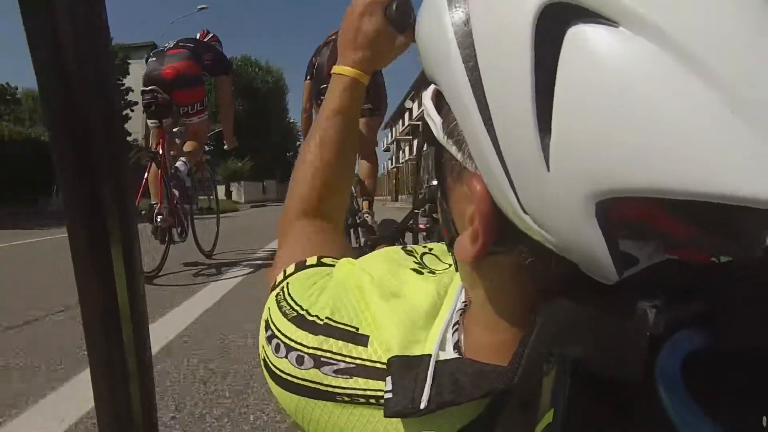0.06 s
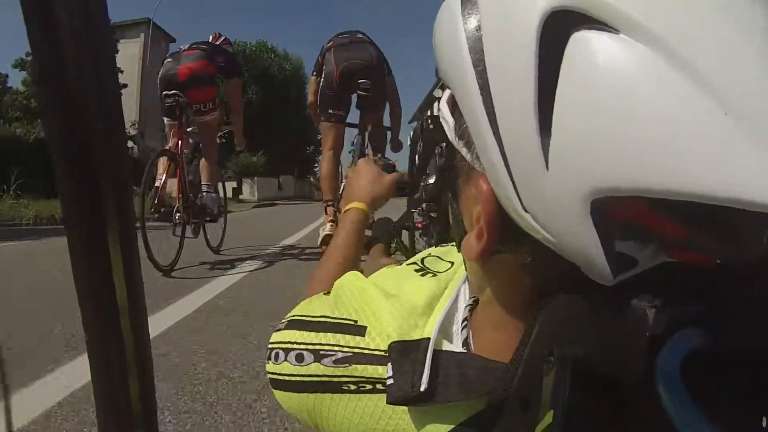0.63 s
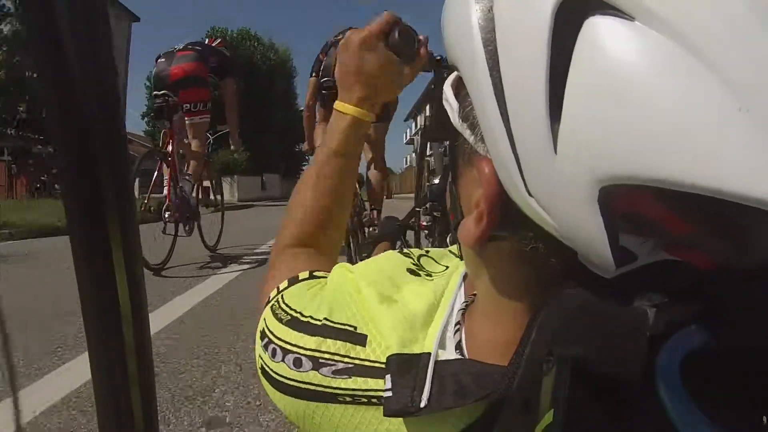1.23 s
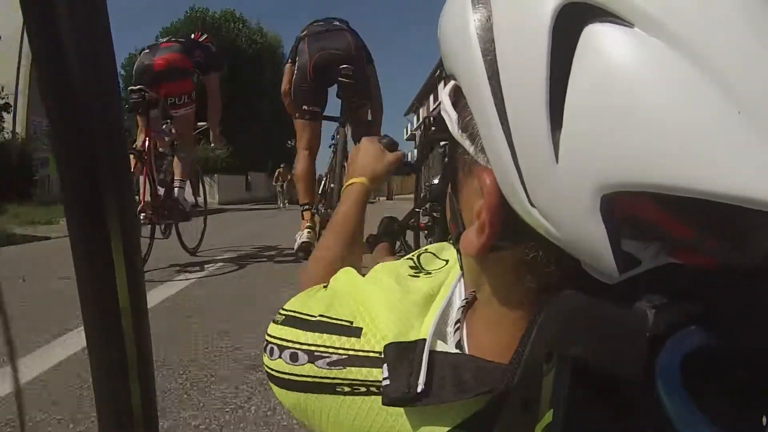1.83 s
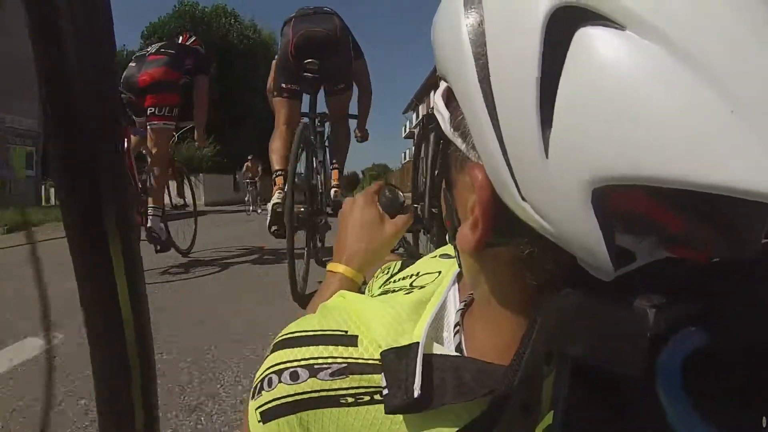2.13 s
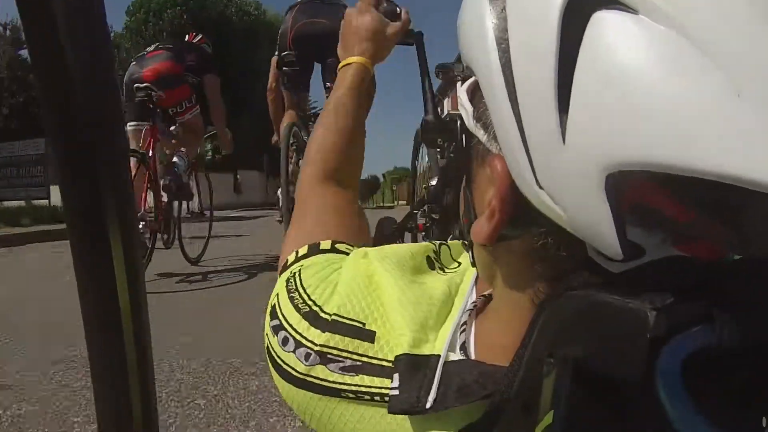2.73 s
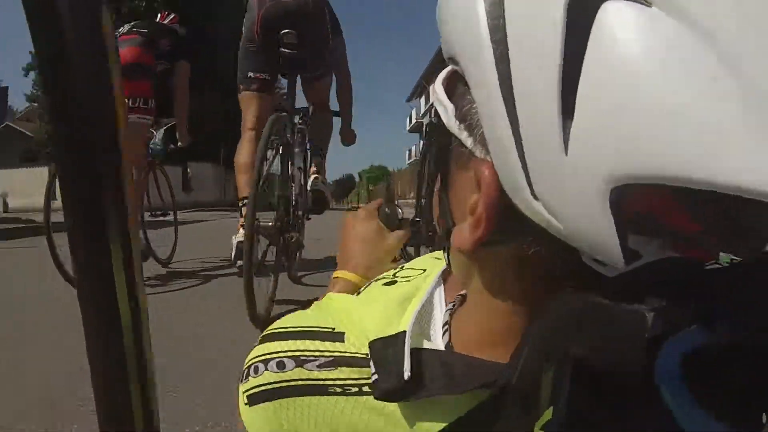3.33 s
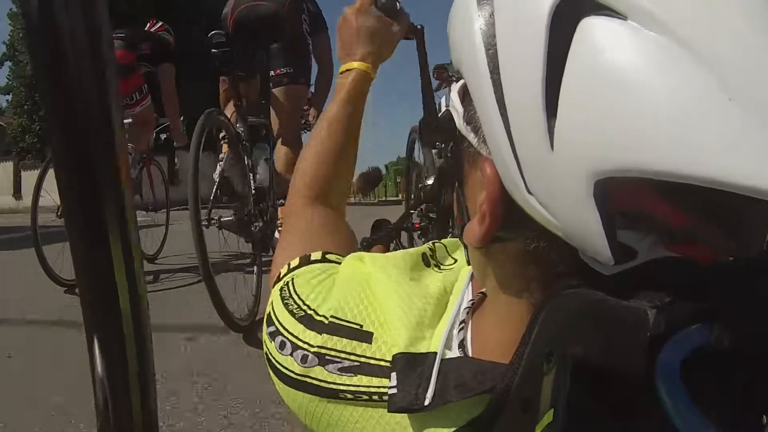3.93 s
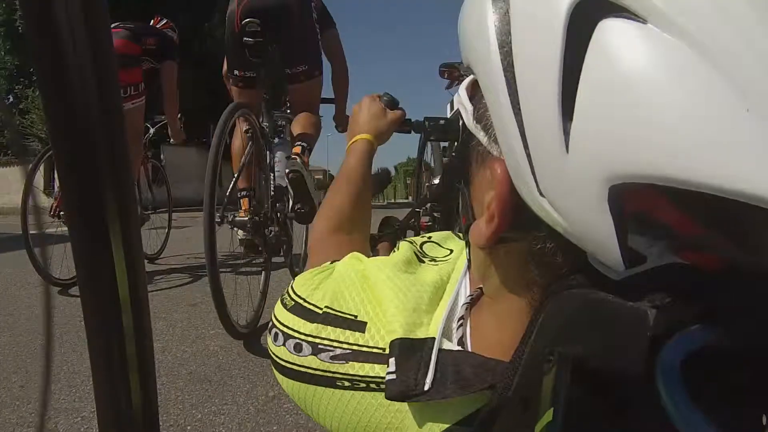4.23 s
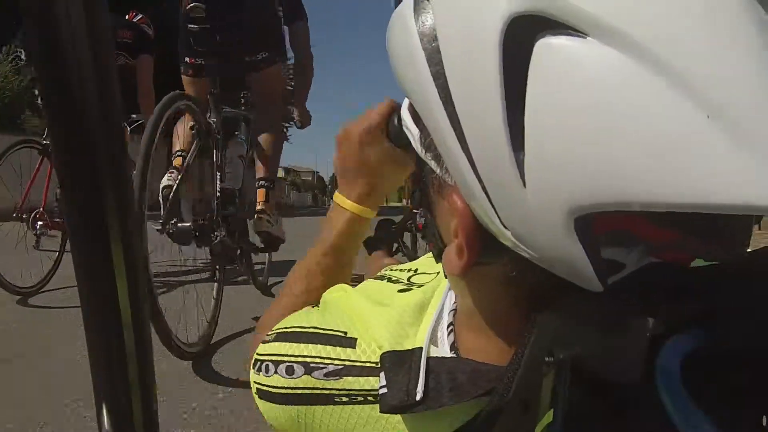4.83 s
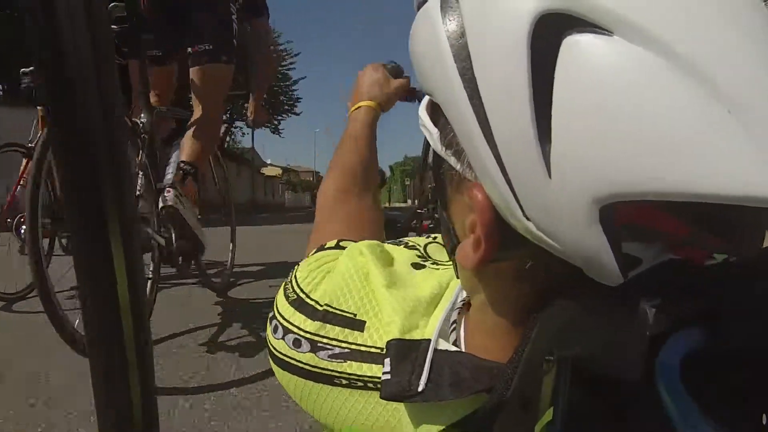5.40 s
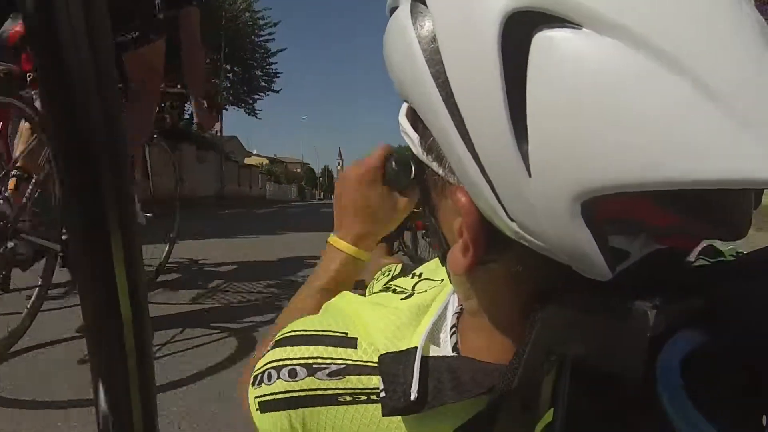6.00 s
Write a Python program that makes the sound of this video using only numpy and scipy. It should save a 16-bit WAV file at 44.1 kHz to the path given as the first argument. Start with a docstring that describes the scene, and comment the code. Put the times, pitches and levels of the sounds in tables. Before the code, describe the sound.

Wind rumbles in quick gusts on a microphone enclosed in a hard case on a moving handbike. Road vibration makes a wavering low hum, with tyres and chain rushing softly behind it. Plastic rattles busily through the first half, broken by thumps from bumps and a drain cover. The ride then sounds smoother for a moment, until lighter rattling and more clattering bumps arrive near the end.

```python
"""A camera in a hard case rides on a fast handbike over asphalt. From the start the road shakes its
mount into a rough low hum, wind rumbles on the microphone, the frame drones, tyres and chain rush,
and the case chatters on the swings. Bumps and a drain cover thump and clatter, hardest near 1 s,
2.2 s and 3.3 s. The chatter then drops away and partly returns before more bumps at 5.2-5.8 s."""
import sys
import numpy as np
from scipy import signal
from scipy.fft import rfft, irfft
from scipy.io import wavfile
from scipy.ndimage import uniform_filter1d

SR = 44100
rng = np.random.default_rng(int(sys.argv[2]) if len(sys.argv) > 2 else 0)


def to_wav(s):
    """Save 16-bit WAV."""
    ch = np.atleast_2d(s).T  # columns
    pcm = np.round(np.clip(ch, -1, 1) * 32767)  # PCM
    wavfile.write(sys.argv[1], SR, pcm.astype(np.int16))


N = 271656
TIME = np.arange(N) / SR

# jolts that bottom out the mount: t/s, relative thump/dB, relative snap/dB, lull depth/dB
JOLT_EVENTS = [(0.111, -7, -16, 0), (.963, -8, -10, 1.5), (0.981, -2, -10, -2), (2.143, -1.5, -10, 1),
               (2.169, -12, -17, 0.5), (2.304, -9.5, -4.5, 2), (2.653, -4, -14, 1), (2.875, -4.5, -22, 1.5),
               (2.971, -5, -10.5, -0.5), (3.19, -4, -8, 6.5), (3.21, -5.5, -3.5, -0.5),
               (3.307, 0.5, -4, 6.5), (3.972, -18, -18, 0), (4.38, -11, -22, 0.5), (5.237, -4.5, -14, 0.5),
               (5.494, -15, -4, 1), (5.778, -5.5, -7, 7)]
# case resonances: f/Hz, width/Hz, lift/dB
CASE_MODES = [(573, 82, 4.5), (758, 8.3, 6.5), (885, 34, 7), (1097, 53, -6.5), (1450, 75, 2.5),
              (2052, 200, 4), (2270, 92, 1.5), (3840, 100, 4.5), (4260, 80, 3), (5150, 19, -12.5)]
# spectrum of the tapped case walls: f/Hz, level/dB
PING_SPECTRUM = [(800, -14), (1350, -2), (1550, -2.5), (1750, -16.5), (1930, 2.5), (2100, 3.5), (2230, -8),
                 (2380, 2), (2560, -6.5), (2720, -19.5), (3300, -28), (4400, -31)]
# spectrum of loose parts: f/Hz, level/dB
CLATTER_SPECTRUM = [(100, 1.5), (250, 10.5), (420, 7.5), (520, 1.5), (630, 3.5), (950, -4), (1500, -1.5),
                    (2200, -5.5), (2650, -3), (3000, -6.5), (3450, -18), (4500, -28), (6200, -35.5),
                    (12000, -54.5)]


def from_db(db):
    """Decibels to gain."""
    return 10 ** (np.asarray(db) / 20)


def curve(rows):
    """Breakpoints joined by lines over time."""
    return np.interp(TIME, *np.transpose(rows))


def levelled(x, window_s):
    """Holds the running rms at 1; faster flutter stays."""
    size = max(int(window_s * SR), 8)
    power = uniform_filter1d(uniform_filter1d(x ** 2, size), size)
    return x / np.sqrt(abs(power) + 1e-4 * np.mean(x ** 2))


def wander(rate_hz):
    """Smooth random signal, rms 1, bandwidth about rate_hz."""
    lowpass = np.exp(-(np.fft.rfftfreq(N, 1 / SR) / rate_hz) ** 2)
    drift = irfft(rfft(rng.standard_normal(N)) * lowpass, N)
    return drift / drift.std()


def coloured(x, spectrum, modes=(), size=16384):
    """Minimum-phase filter of unit energy: broad spectrum, steep ends, resonances on top."""
    hz = abs(np.fft.fftfreq(size, 1 / SR)) + 1
    points_hz, points_db = np.transpose(spectrum)
    points_hz = np.sort(points_hz)
    octaves_outside = abs(np.log2(hz / np.clip(hz, points_hz[0], points_hz[-1])))
    db = np.interp(np.log(hz), np.log(points_hz), points_db)
    db = np.maximum(db - 48 * octaves_outside, -120)
    for centre_hz, width_hz, lift_db in modes:
        db = db + lift_db / (1 + (2 * (hz - centre_hz) / width_hz) ** 2)
    response = np.exp(np.conj(signal.hilbert(np.log(from_db(db)))))
    ring = np.fft.ifft(response).real[:size // 2] * np.hanning(size)[size // 2:]
    return signal.oaconvolve(x, ring / np.linalg.norm(ring))[:N]


def lull_db(delay_s=.073, sharpness=1.7):
    """Level drop after each jolt, deepest at delay_s; a negative depth gives a swell."""
    total_db = np.zeros(N)
    for at_s, _, _, depth_db in JOLT_EVENTS:
        age = np.maximum(TIME - at_s, 0) / delay_s
        total_db += depth_db * (age * np.exp(1 - age)) ** sharpness
    return total_db


def mount_hum(width_hz=6, waver_db=2, trim_db=-.11):
    """Road grain drives the springy mount, which swings around one pitch and wavers in strength."""
    # hum pitch: t/s, f/Hz
    pitch = [(0, 136.6), (.55, 134.6), (.85, 142.9), (1.6, 135), (2.8, 138), (3.5, 136), (4.1, 142.4),
             (5.1, 143), (5.45, 133), (6.16, 137)]
    # swing strength: t/s, level/dB
    levels = [(0, -15.5), (.3, -15), (.55, -13.5), (1.15, -12), (1.3, -15.5), (1.85, -12), (2.1, -12.5),
              (2.23, -22.5), (2.45, -20.5), (2.65, -15), (3.12, -14), (3.6, -16.5), (4.2, -13), (4.5, -11),
              (4.8, -13), (5.25, -13.5), (5.6, -14), (6.16, -15)]
    # brief dips of the hum: t/s, depth/dB, half length/s
    dips = [(0.159, 9, 0.025), (0.958, 13, 0.034), (3.03, 9.5, 0.049), (3.215, 7.5, 0.044),
            (3.832, 11.5, .028), (4.87, 12, 0.03), (5.352, 7, .03)]
    grain = rng.standard_normal(N) + 1j * rng.standard_normal(N)
    pole = np.exp(-np.pi * width_hz / SR)
    sway = signal.lfilter([1 - pole], [1, -pole], grain)
    sway = signal.sosfilt(signal.butter(2, 60, fs=SR, output="sos"), sway)
    swing = (sway * np.exp(2j * np.pi * np.cumsum(curve(pitch)) / SR)).real
    swing = levelled(swing, .05) * from_db(waver_db * wander(11))
    dips_db = sum(db * np.exp(-((TIME - at_s) / half_s) ** 2) for at_s, db, half_s in dips)
    return levelled(swing, .2) * from_db(curve(levels) + trim_db - dips_db - 1.05 * lull_db())


def wind(gust_db=2, gust_hz=12):
    """Eddies buffet the microphone in quick gusts."""
    # rumble spectrum: f/Hz, level/dB
    spectrum = [(14, -20), (26, -6), (42, 1.5), (65, -2), (95, -1.5), (120, -4.5), (170, -9), (230, -24.5),
                (400, -63)]
    # wind strength: t/s, level/dB
    levels = [(0, -16.5), (.55, -21), (1.3, -21), (1.72, -15.5), (1.9, -21), (2.45, -22), (2.97, -17),
              (3.45, -22.5), (4.3, -18), (4.65, -25), (4.95, -18), (5.3, -22.5), (5.7, -19.5),
              (6.16, -19.5)]
    eddies = coloured(rng.standard_normal(N), spectrum) * from_db(gust_db * wander(gust_hz))
    return levelled(eddies, .13) * from_db(curve(levels) - lull_db())


def frame_drone(flutter_db=1.37, flutter_hz=12):
    """The frame drones above the mount's pitch."""
    # drone spectrum: f/Hz, level/dB
    spectrum = [(120, -32), (165, -1.5), (185, 0.5), (215, -3.5), (250, -1), (275, -4.5), (310, -13.5),
                (400, -18.5), (520, -27.5)]
    # frame resonance: f/Hz, width/Hz, lift/dB
    modes = [(249.2, 24, 5)]
    # drone strength: t/s, level/dB
    levels = [(0, -25.5), (.47, -23), (.62, -25.5), (.98, -20.5), (1.2, -26), (1.6, -22.5), (1.78, -22),
              (2.45, -26), (2.75, -25), (2.94, -21), (3.1, -24.5), (3.78, -27), (3.92, -18.5),
              (4.15, -24.5), (4.72, -23), (5.33, -25.5), (5.48, -22.5), (6.16, -24)]
    drone = levelled(coloured(rng.standard_normal(N), spectrum, modes), .12)
    return drone * from_db(curve(levels) + flutter_db * wander(flutter_hz) - .93 * lull_db())


def tyres_and_chain(patchy_db=2.5, patchy_hz=60):
    """Tyres and chain rush unevenly over the asphalt, heard through the case."""
    # rush spectrum: f/Hz, level/dB
    spectrum = [(200, -12.5), (400, 1.5), (600, -1), (760, -0.5), (1050, 3.5), (1300, 4), (1700, -1.5),
                (2300, -21.5), (2700, -24), (3400, -33.5), (5000, -44), (8000, -50), (12000, -60.5)]
    # rush strength: t/s, level/dB
    levels = [(0, -34.5), (.8, -39), (1.65, -36), (2.4, -37.5), (3.1, -36), (3.45, -40.5), (3.6, -37.5),
              (4.2, -34.5), (4.8, -36), (5.35, -37), (6.16, -35.5)]
    grain = rng.standard_normal(N) * from_db(patchy_db * wander(patchy_hz))
    return levelled(coloured(grain, spectrum, CASE_MODES), .4) * from_db(curve(levels) - lull_db())


def scrapes(at, sizes, decay_s):
    """A dying noise burst at each contact sample."""
    fade = np.exp(-TIME[:SR // 40] / decay_s)
    return signal.oaconvolve(np.bincount(at, sizes, N), fade)[:N] * rng.standard_normal(N)


def case_chatter(shake, scatter_db=2, backswing_db=-6, edge_db=5.5, jitter_s=.0006, flurry_db=1.03):
    """At each turn of the swing the camera taps and scuffs its case; wide swings hit harder."""
    # looseness of the camera in its case: t/s, relative level/dB
    looseness = [(0, 1.5), (.25, -11.5), (.48, -3), (1.3, -4.5), (1.78, -0.5), (2.12, -5.5), (2.2, -15),
                 (2.55, -10.5), (3.16, -8), (3.42, -31), (3.76, -32.5), (3.92, -20.5), (4.4, -21.5),
                 (4.72, -10.5), (4.88, -20.5), (5.12, -15.5), (5.95, -19.5), (6.16, -16.5)]
    # scuff spectrum: f/Hz, level/dB
    buzz_spectrum = [(600, -27), (900, -11.5), (1300, 1.5), (1900, 5), (2200, -10.5), (2520, 5.5),
                     (2720, -22), (3400, -14), (4150, -23), (4400, -15), (4650, -36), (6300, -29.5),
                     (7300, -45.5)]
    # spectrum of sharp contacts: f/Hz, level/dB
    tick_spectrum = [(4000, -9.5), (6200, -9.5), (7100, -20.5), (8200, -7), (8600, -18), (8850, 0),
                     (9600, -1), (10100, -7), (10550, -2.5), (11000, -16.5), (11700, -7.5), (12200, -22.5),
                     (12700, -32.5)]
    smooth = signal.sosfiltfilt(signal.butter(2, 300, fs=SR, output="sos"), shake)
    slope = np.diff(smooth, prepend=0)
    turns = np.flatnonzero(slope[1:] * slope[:-1] < 0)
    scatter, late, edge = rng.standard_normal((len(turns), 3)).T
    at = np.clip(turns + (late * jitter_s * SR).astype(int), 0, N - 1)
    force = abs(shake[turns]) * from_db(scatter_db * scatter + backswing_db * (shake[turns] > 0))
    force = np.tanh(force / .9)  # the case gives under the hardest taps
    loose_db = curve(looseness) - 1.3 * lull_db()

    pings = coloured(np.bincount(at, force ** 2, N), PING_SPECTRUM, CASE_MODES)
    buzz = coloured(scrapes(at, force, decay_s=.0021), buzz_spectrum, CASE_MODES)
    walls = levelled(pings, .14) + levelled(buzz, .23) * from_db(-3)
    walls *= from_db(-32 + .52 * loose_db)

    exponent = 1.5 + .045 * np.clip(-6 - loose_db[turns], 0, 12)  # snug case: only hard contacts tick
    sharp = force * from_db(edge_db * edge)
    sharp = np.minimum(sharp / np.percentile(sharp, 90), 1.1) ** exponent
    ticks = coloured(scrapes(at, sharp, decay_s=.0011), tick_spectrum, CASE_MODES)
    ticks = levelled(ticks, .13) * from_db(-51.5 + loose_db)
    return (walls + ticks) * from_db(flurry_db * wander(22))


def grit(rate_hz=28, level_db=-15, spread_db=1):
    """Small stones and cracks in the asphalt send single clicks up the frame."""
    sizes = from_db(level_db + spread_db * np.minimum(rng.exponential(1, N), 3))
    return coloured(sizes * (rng.random(N) < rate_hz / SR), CLATTER_SPECTRUM, CASE_MODES)


def peak_clicks(shake, threshold=.46, gain_db=-13):
    """A small dry broadband click sounds on the widest swings of the hum."""
    # click spectrum: f/Hz, level/dB
    spectrum = [(1500, 5.5), (6000, 0), (9000, -11.5), (12000, -24.5)]
    peaks = signal.find_peaks(abs(shake), height=threshold, distance=SR // 400)[0]
    overshoot = np.minimum(abs(shake[peaks]) - threshold, .15)
    return coloured(np.bincount(peaks, overshoot, N) * from_db(gain_db), spectrum, CASE_MODES)


def shove(at_s, width_s):
    """One smooth push with a swing back on either side."""
    spread = np.minimum(((TIME - at_s) / width_s) ** 2, 60)
    return (1 - spread) * np.exp(-spread / 2)


def jolts(push_s=.0018, heave_s=.005, heave_db=-9, snap_s=.0051, snap_gain_db=6):
    """Hard bumps shove the whole camera: a low thump on a deeper heave, with a snap of plastic."""
    # snap spectrum: f/Hz, level/dB
    spectrum = [(300, 9.5), (1000, 7), (3000, -5), (4500, -9.5), (6500, -19.5), (9000, -30.5), (14000, -36)]
    thumps, snaps = np.zeros(N), np.zeros(N)
    for at_s, thump_db, snap_db, _ in JOLT_EVENTS:
        thumps += from_db(thump_db) * (shove(at_s, push_s) + from_db(heave_db) * shove(at_s, heave_s))
        snaps[int(at_s * SR)] += from_db(snap_db + snap_gain_db)
    fade = np.exp(-TIME[:SR // 50] / snap_s)
    crack = signal.oaconvolve(snaps, fade / np.linalg.norm(fade))[:N] * rng.standard_normal(N)
    return thumps + coloured(crack, spectrum, CASE_MODES)


def knocks(gain_db=1.9, grain_db=4, clack_rate_hz=450, tail_s=.015, tail_db=-18):
    """Each bump sets off a tight clatter of loose parts: hard clacks in a short gritty rattle."""
    # bumps: t/s, relative level/dB, clatter half length/s
    bumps = [(.157, -23, .0025), (.41, -25.5, .0045), (0.77, -26, .0035), (.967, -16, .0064),
             (.982, -16, .0044), (1.493, -24.5, .0037), (2.171, -20, 0.0024), (2.236, -27, 0.01),
             (2.264, -22, 0.0016), (2.312, -17.5, 0.0042), (2.333, -28, .0032), (2.65, -30, .0058),
             (2.878, -24.5, .0081), (2.981, -23, .0031), (2.997, -24, .0033), (3.223, -19.5, .004),
             (3.233, -21, 0.002), (3.273, -23.5, 0.0037), (3.309, -20.5, .0008), (3.388, -33.5, 0.013),
             (3.567, -32.5, .0079), (3.648, -28, .0024), (4.481, -33, 0.0029), (4.757, -30, .0021),
             (4.94, -22, .005), (4.981, -22, .0057), (5.098, -25.5, .0032), (5.118, -20, .0049),
             (5.139, -26.5, 0.0024), (5.47, -24.5, .0041), (5.497, -17, 0.0066), (5.533, -21.5, 0.0034),
             (5.776, -17, .008), (5.828, -26, .0028), (5.857, -28, .0025)]
    # resonances of the loose parts: f/Hz, width/Hz, lift/dB
    modes = [(617, 46, 3), (1200, 200, 5), (3050, 1000, 1.5)]
    rattle = levelled(rng.standard_normal(N) * from_db(grain_db * wander(450)), .0024)
    clacks = 7 * rng.choice([-1, 1], N) * rng.uniform(1, 1.1, N)
    clacks *= rng.random(N) < clack_rate_hz / SR
    grains = levelled(rattle + clacks, .014)
    power = np.zeros(N)
    for at_s, db, half_s in bumps:
        near = slice(max(int((at_s - .05) * SR), 0), int((at_s + .15) * SR))
        t = TIME[near] - at_s
        burst = np.exp(-(t / half_s / np.where(t < 0, .93, 1)) ** 2)
        tail = from_db(tail_db) ** 2 * (t > 0) * np.exp(-abs(t) / tail_s)
        power[near] += from_db(db + gain_db) ** 2 * (burst + tail)
    return coloured(grains * np.sqrt(power), CLATTER_SPECTRUM, CASE_MODES + modes)


def case_raps(gain_db=8.5):
    """Now and then the camera hits its case hard enough to ring out alone."""
    # hard contacts: t/s, relative level/dB
    contacts = [(.368, -11), (.642, -21), (.832, -8), (.872, -10), (0.911, -24), (1.269, -11), (1.441, -11),
                (2.132, -19), (2.46, -13), (2.644, -10), (2.871, -7.5), (3.109, -8.5), (4.209, -14.5),
                (4.606, -14), (4.752, -6)]
    at_s, db = np.transpose(contacts)
    hits = np.bincount((at_s * SR).astype(int), from_db(db + gain_db), N)
    return coloured(hits, PING_SPECTRUM, CASE_MODES)


def scene():
    """Mono mix; the camera's shake is heard itself and drives the chatter and peak clicks."""
    shake = mount_hum() + wind() + frame_drone()
    camera = shake + jolts() + case_chatter(shake) + case_raps() + peak_clicks(shake)
    return (camera + tyres_and_chain() + knocks() + grit())[None]


def record(dry):
    """Soft clip, then low-pass."""
    ceiling, cutoff_hz = .95, 15200
    rounded = dry / (1 + (dry / ceiling) ** 6) ** (1 / 6)
    lowpass = signal.firwin(511, cutoff_hz, window=("kaiser", 9), fs=SR)
    return signal.oaconvolve(rounded, lowpass[None], "same")


dry = scene()
out = record(dry)
to_wav(out)
```